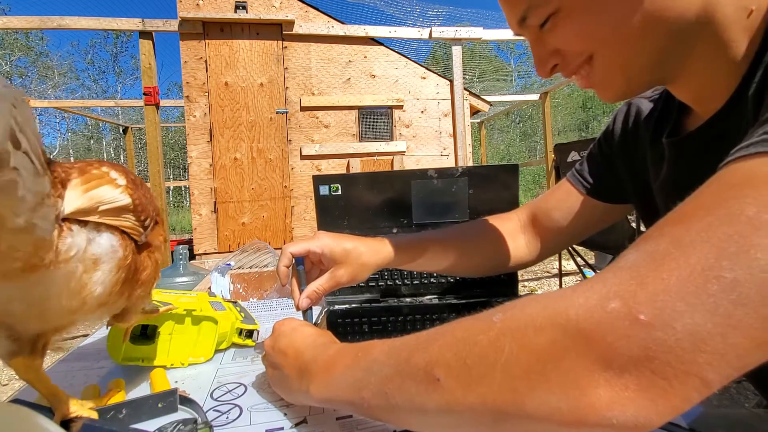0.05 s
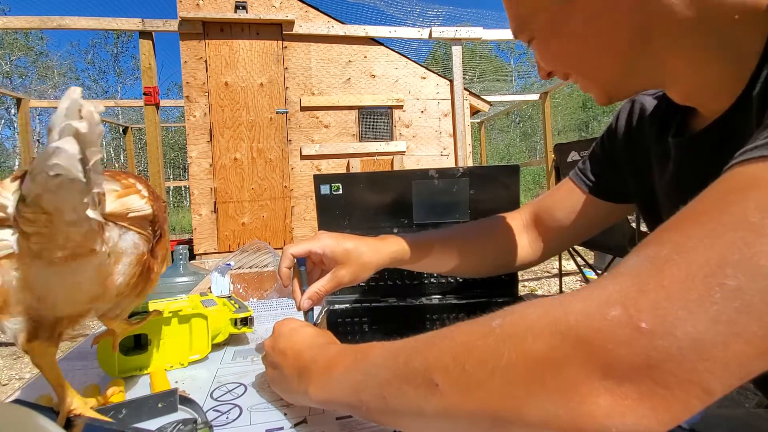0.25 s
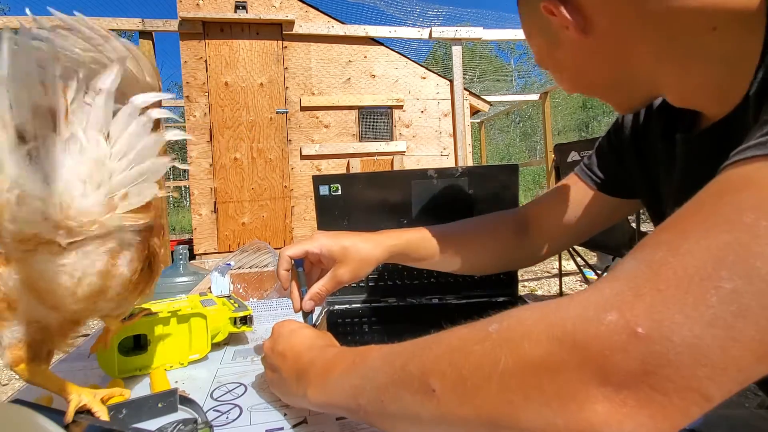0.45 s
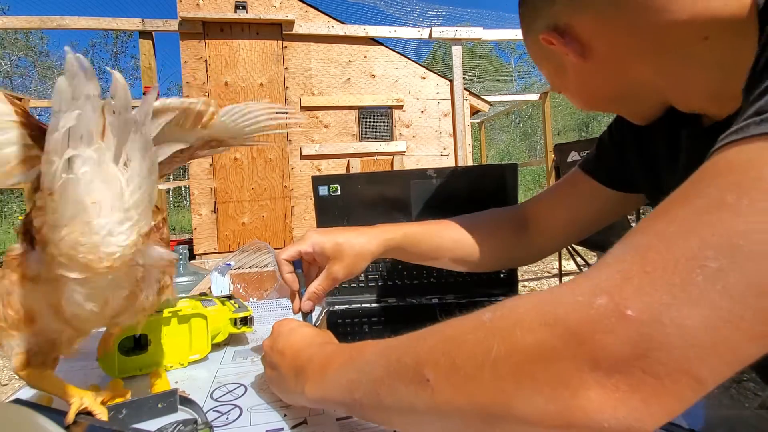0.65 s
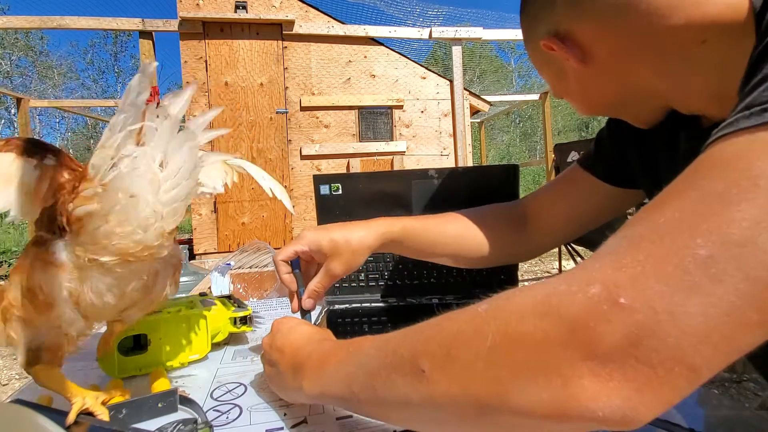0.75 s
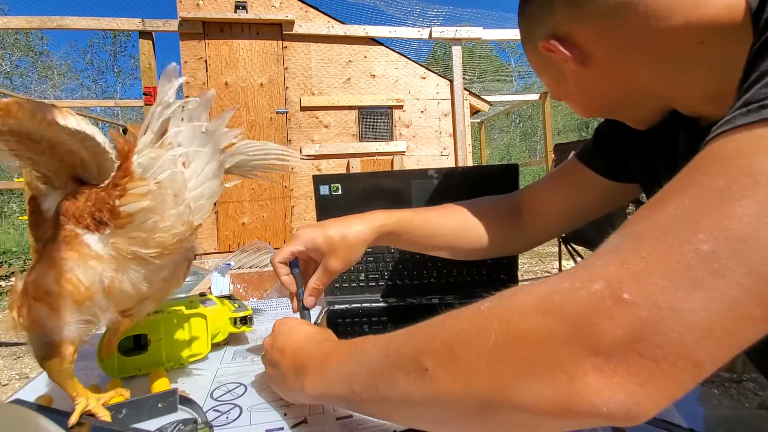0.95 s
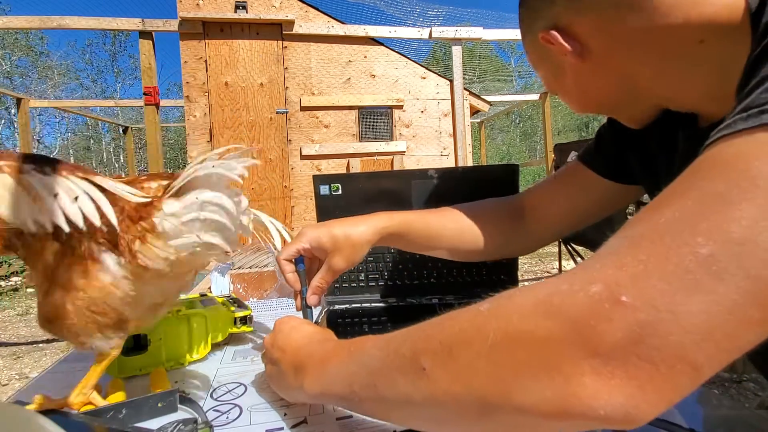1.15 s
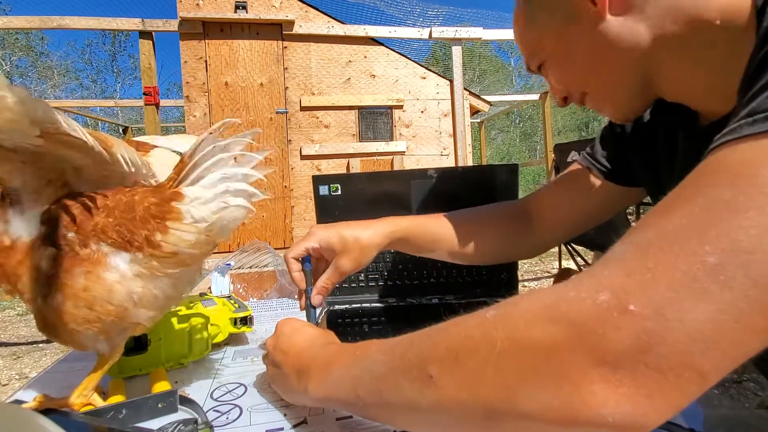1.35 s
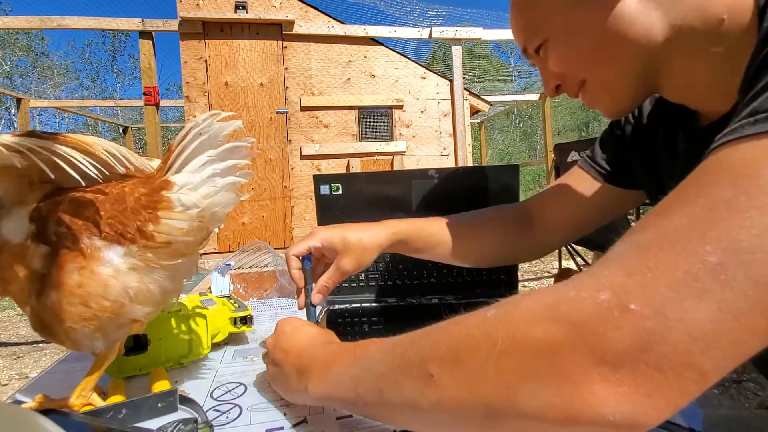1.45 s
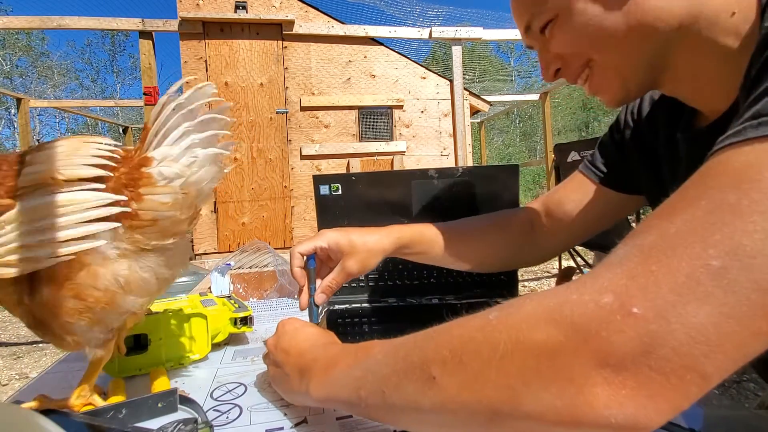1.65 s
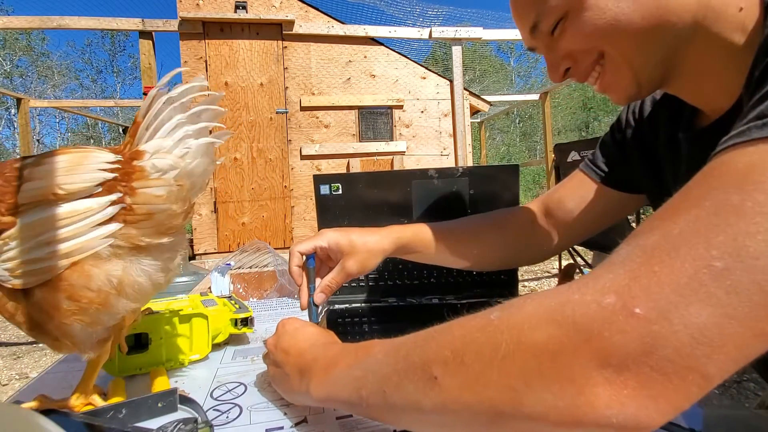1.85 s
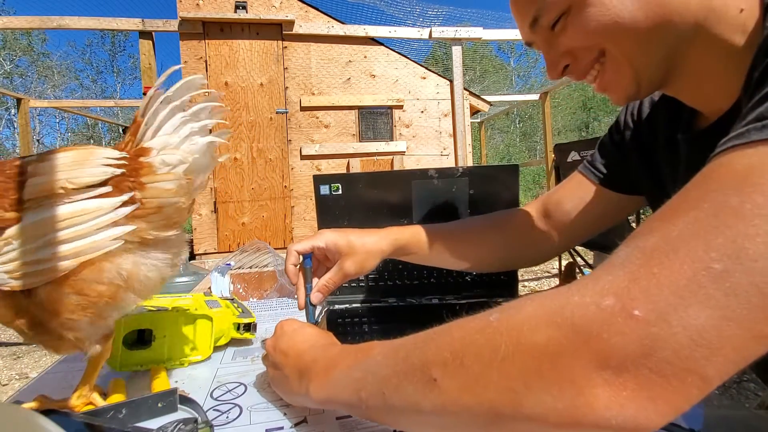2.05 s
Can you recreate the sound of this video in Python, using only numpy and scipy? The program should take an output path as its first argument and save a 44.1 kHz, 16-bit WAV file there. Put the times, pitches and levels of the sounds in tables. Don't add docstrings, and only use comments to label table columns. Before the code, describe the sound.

A hen flaps its wings right beside a stereo microphone, slightly left: a dense burst of feathery slaps early on, a pause with soft rustles, another short flap, then low air buffeting over faint yard hiss.

```python
import sys
import numpy as np
from scipy import signal
from scipy.fft import rfft, irfft
from scipy.io import wavfile
from scipy.ndimage import uniform_filter1d

SR = 44100
rng = np.random.default_rng(int(sys.argv[2]) if len(sys.argv) > 2 else 0)


def output_pcm(signal):
    pcm = np.clip(np.atleast_2d(signal).T, -1, 1) * 32767
    wavfile.write(sys.argv[1], SR, np.round(pcm).astype(np.int16))


def decibels_to_gain(level_db):
    exponent = np.asarray(level_db, float) / 20
    return 10 ** exponent


N = 92610
HALF_SIDE = np.array([[.5], [-.5]])
RIGHT_ONLY = np.array([[0], [1]])


def evened(x):
    return x / np.sqrt(np.mean(x ** 2) + 1e-20)


def read(points, hz):
    point_hz, value = np.transpose(points)
    return np.interp(np.log(hz + 1), np.log(point_hz + 1), value)


def coloured(x, gain):
    hz = np.fft.rfftfreq(x.shape[-1], 1 / SR)
    return irfft(rfft(x) * gain(hz), x.shape[-1])


def slow(hz, shape=N):
    return evened(coloured(rng.standard_normal(shape), lambda f: 1 / (1 + (f / hz) ** 2)))


def steadied(x, window_s):
    power = uniform_filter1d(x ** 2, size=max(int(window_s * SR), 3))
    return x / np.sqrt(power + 1e-20)


def burst(start_s, rise_s, fade_s):
    t = np.maximum(np.arange(N) / SR - start_s, 0)
    rise_s = max(rise_s, 1e-4)
    fall = decibels_to_gain(-60 * np.maximum(t - rise_s, 0) / max(fade_s, 1e-3))
    return np.minimum(t / rise_s, 1) * fall


def swirl(centre_s, half_s, hz, turn, lead=1):
    t = np.arange(N) / SR - centre_s
    width_s = np.where(t < 0, lead * half_s, (2 - lead) * half_s)
    return np.exp(-.5 * (t / width_s) ** 2) * np.cos(2 * np.pi * hz * t + turn)


def slaps(per_s, spread_db):
    shape = (2, N)
    happens = rng.random(shape) < per_s / SR
    size = decibels_to_gain(spread_db * np.minimum(rng.exponential(1, shape), 4))
    near, far = evened(rng.standard_normal(shape) * happens * size)

    def unlike(f):
        return f / np.hypot(f, 845)

    def alike(f):
        return np.sqrt(1 - unlike(f) ** 2)
    return np.array([near, coloured(near, alike) + coloured(far, unlike)])


def strokes():
    # start_s, peak_db, rise_s, fade_s (to fall 60 dB), tilt_db (per octave)
    wing_strokes = [(0.202, -6, 0.0023, 0.11, 2.74), (0.22, -8, 0.00092, 0.12, 3),
                    (0.23, -10, 0.0033, 0.24, 2.7), (0.258, -19.5, 0.0047, 0.58, 3.5),
                    (0.296, -23, 0.0031, 0.19, 4), (.317, -8, 0.0008, 0.14, 1.5),
                    (0.334, -14, 0.006, 0.27, 2.5), (0.362, -23.5, 0.0063, 0.068, -5),
                    (0.377, -29, 0.0071, 0.061, 1), (.42, -26.5, 0.021, 0.14, -0.5),
                    (.507, -25, 0.0023, 0.18, 3), (0.562, -33, 0.052, 0.27, -2),
                    (0.71, -27.5, 0.0014, 0.081, -1), (0.734, -25, 0.0039, 0.1, 1.5),
                    (0.841, -41, 0.033, 0.059, -2), (1.027, -31, 0.041, 0.19, 0.9),
                    (1.063, -26, 0.0025, 0.18, 4.65), (1.152, -11, 0.00022, 0.079, -0.3),
                    (1.166, -20.5, 0.0045, 0.41, 0.8), (1.211, -20, 0.0028, 0.11, 2.5),
                    (1.28, -39, 0.0077, 0.083, 2), (1.388, -38.5, 0.0032, 0.22, -2.5),
                    (1.717, -36.5, .003, 0.039, 0.5)]
    # pitch_hz, level_db (per Hz)
    stroke_colour = [(29, -70), (50, -3), (176, 1), (394, -12.5), (484, -10.5), (1330, -14.5),
                     (1560, -17.5), (3560, -27), (12000, -62.5), (15600, -63), (22000, -120)]
    # pitch_hz, width_hz, level_db
    body_modes = [(304, 13, 8), (483, 62, -0.5), (601, 85, -3.5), (1023, 49, -10)]
    body_db, stroke_db, low_db = 0.5, -7.5, -3
    clump_db, clump_hz, steady_s = 2.2, 70, 0.0173
    crack_db, crack_fade_s = -4.5, 0.0064
    bass_linger, bass_lag_s = 0.35, 0.0091

    def colour(f):
        ringing = sum(decibels_to_gain(db) / (1 + 2j * (f - hz) / width) for hz, width, db in body_modes)
        return decibels_to_gain(read(stroke_colour, f)) * (1 + decibels_to_gain(body_db) * ringing)

    rush = evened(coloured(slaps(per_s=9000, spread_db=2), colour))
    out = np.zeros((2, N))
    for octave in range(-4, 5):

        def octave_gain(f):
            distance = np.log2(f / 700 + 1e-9) - octave
            return np.cos(np.pi / 2 * np.clip(distance, -1, 1)) ** 2

        band = coloured(rush, octave_gain)
        clumps = decibels_to_gain(clump_db * slow(clump_hz))
        band = steadied(band, steady_s * 2. ** max(-octave, 0)) * band.std() * clumps
        power = 0
        for start_s, db, rise_s, fade_s, tilt in wing_strokes:
            swell_s = rise_s + bass_lag_s * max(-octave - 1, 0)
            body = burst(start_s, swell_s, fade_s * 2 ** (-bass_linger * octave))
            crack = decibels_to_gain(crack_db) * burst(start_s, swell_s, crack_fade_s)
            level = decibels_to_gain(db + tilt * max(octave, -2.6))
            power = power + level ** 2 * (body ** 2 + crack ** 2)
        out += band * np.sqrt(power) * decibels_to_gain(low_db * (octave < -1))
    return decibels_to_gain(stroke_db) * out


def swishes():
    # start_s, peak_db, rise_s, fade_s (to fall 60 dB), pitch_hz
    vane_swishes = [(.01, -65, 0.26, 3.0, 12100), (.105, -48.5, 0.027, 0.22, 2780),
                    (.105, -54.5, 0.029, 0.18, 8900), (0.204, -48, 0.0011, .03, 9050),
                    (.221, -45, .001, 0.038, 11000), (0.28, -47, .002, 0.034, 9000),
                    (0.316, -52, 0.0017, 0.11, 11000), (.427, -35.5, 0.003, 0.014, 9100),
                    (0.506, -46, 0.0017, 0.061, 8600), (0.536, -46, 0.0065, 0.062, 10200),
                    (.57, -57, 0.017, 0.2, 12000), (.735, -52.5, .002, 0.04, 9500),
                    (.856, -53, 0.002, 0.02, 9000), (1.063, -41.5, 0.00089, 0.03, 11400),
                    (1.077, -59, .001, .01, 7000), (1.095, -50.5, .015, 0.34, 7900),
                    (1.15, -42, .002, 0.025, 11900), (1.158, -50, 0.0016, 0.26, 11300),
                    (0.738, -38.5, 0.0017, 0.032, 2600), (.542, -44, .004, .04, 3640),
                    (0.734, -48, 0.0017, 0.028, 5500), (1.078, -51, 0.00093, .015, 14500)]
    # start_s, peak_db, fade_s (to fall 60 dB), pitch_hz
    quill_taps = [
        (1.067, -36, .03, 4000),
        (1.1525, -28, .025, 2100),
        (1.173, -46, .015, 5000),
        (1.214, -35, .06, 2200),
    ]
    fizz = slaps(per_s=12000, spread_db=2.5)

    def band(hz, share):
        narrow = coloured(fizz, lambda f: 1 / (1 + ((f - hz) / (share * hz)) ** 4))
        return steadied(narrow, .006)

    out = np.zeros((2, N))
    for start_s, db, rise_s, fade_s, hz in vane_swishes:
        out += decibels_to_gain(db) * burst(start_s, rise_s, fade_s) * band(hz, share=.5)
    for start_s, db, fade_s, hz in quill_taps:
        out += decibels_to_gain(db) * burst(start_s, .001, fade_s) * band(hz, share=.1)
    return out


def rings():
    # peak_s (the actual peak comes 0.65 half-lengths sooner), peak_db, half_length_s, pitch_hz
    blows = [(0.207, -24, 0.00547, 623), (.213, -21.5, 0.0088, 492), (.214, -22, 0.0075, 907),
             (.217, -20, 0.01, 307), (.227, -27, 0.0036, 243), (.230, -27, 0.0049, 613),
             (.239, -24, 0.0055, 494), (.275, -22, 0.0035, 196), (.321, -27, 0.0038, 594),
             (.338, -28.5, 0.00503, 460), (.341, -25.5, 0.01885, 316.3), (.516, -48, 0.0071, 1095),
             (.59, -39, 0.011, 450), (.605, -39, 0.021, 300), (.61, -45, .018, 702),
             (0.717, -40, 0.0058, 657), (.742, -39.5, 0.0064, 1074), (.75, -44, 0.012, 657),
             (1.068, -36, 0.012, 210), (1.085, -42, 0.028, 504), (1.155, -27, 0.0022, 510),
             (1.163, -24.5, 0.0047, 235), (1.170, -28, 0.0044, 845), (1.174, -32.5, 0.0076, 503),
             (1.79, -41.5, 0.018, 141)]
    lead = .35
    apart_hz = 1200
    out = np.zeros((2, N))
    for peak_s, db, half_s, hz in blows:
        turn = 2 * np.pi * rng.random() - RIGHT_ONLY * hz / apart_hz
        out += decibels_to_gain(db) * swirl(peak_s - (1 - lead) * half_s, half_s, hz, turn, lead)
    return out


def ports(x):
    # pitch_hz, difference_db
    shadow = [(60, -2), (110, -1), (200, 0), (380, 2), (700, 5.5), (1290, 4), (2380, 4.5), (4400, 4.5),
              (8120, 8.5), (15000, 1.5)]
    right_lag_s = 0.00018

    def path(f):
        delay = np.exp(-2j * np.pi * f * RIGHT_ONLY * right_lag_s)
        return decibels_to_gain(HALF_SIDE * read(shadow, f)) * delay
    return coloured(x, path)


def buffeting():
    # time_s, level_db, left_minus_right_db
    breeze = [(0, -41, 5), (.15, -33.5, 14.5), (.45, -35.5, 3.5), (.62, -34.5, 1.5), (.8, -38.5, 10.5),
              (.96, -35.5, 4), (1.07, -37, 2), (1.27, -31.5, 7.5), (1.42, -43, 4), (1.6, -38, 8),
              (1.7, -44, 5.5), (1.81, -37, 18), (1.88, -45, 0), (2.1, -50, 7)]
    # peak_s, peak_db, half_length_s, turning_hz, left_minus_right_db
    gusts = [(0.059, -26.5, 0.0038, 75, 23.5), (0.101, -36.5, 0.015, 98.5, 28),
             (0.151, -31.4, 0.019, 70.7, 6.5), (0.215, -23, 0.0096, 140, -1), (0.222, -31, 0.017, 63, -20),
             (0.231, -21, 0.017, 105.3, -1), (0.236, -23.4, 0.017, 178, 2), (0.26, -24.5, 0.0095, 146, 3),
             (0.297, -29.5, 0.015, 181, 4), (0.31, -29, 0.017, 79, -3), (0.33, -22.5, 0.011, 136, 2),
             (0.357, -24.5, 0.02, 106, 1), (0.365, -33, 0.012, 176, 0.6), (0.368, -32, 0.024, 62, 2),
             (0.372, -19, 0.021, 79.5, 0), (0.398, -33, 0.039, 121.5, -3), (0.517, -25.5, 0.0073, 84, 22.5),
             (0.557, -27.5, 0.015, 78.6, 13.7), (0.669, -30.5, 0.011, 95.5, 10),
             (0.747, -31.5, 0.027, 53, -5), (0.78, -26, 0.0077, 74, 17.4), (0.81, -27, 0.016, 49.7, 6),
             (0.85, -30, 0.012, 67.4, 21.5), (0.881, -32, 0.0035, 73, 17.5), (0.907, -27.5, 0.0063, 67, 27),
             (1.012, -32, 0.01, 67.4, 20.5), (1.121, -26, 0.0093, 55.4, 6), (1.163, -29, 0.0053, 56, 5),
             (1.164, -27, 0.0055, 126, 2), (1.22, -28, 0.025, 73.6, 1.9), (1.315, -23.5, 0.0093, 74, -1),
             (1.353, -29, 0.012, 81, 4), (1.445, -34, 0.0063, 71.4, -21.5),
             (1.479, -25.5, 0.017, 49.5, -10.5), (1.524, -33, 0.018, 73, -11),
             (1.539, -34.5, 0.015, 58.3, 18), (1.616, -38.8, 0.019, 82.5, 27), (1.656, -34, 0.018, 72, 19),
             (1.726, -28, 0.0049, 82, 17.5), (1.775, -41.5, 0.007, 134, 35)]
    # pitch_hz, level_db (per Hz)
    air_colour = [(8.8, -40), (15, -6), (43, -2), (70, -1), (162, -13), (234, -27.5), (282, -30.5),
                  (414, -33.5), (600, -28), (780, -70), (1320, -120)]
    ripple_db, ripple_ratio = -20, 3.1
    apart_per_db = -0.08

    def colour(f):
        return decibels_to_gain(read(air_colour, f) - 12.6 * np.log2(np.maximum(f / 300, 1)))

    t = np.arange(N) / SR
    time_s, level_db, pan_db = np.transpose(breeze)
    air = steadied(coloured(rng.standard_normal((2, N)), colour), 0.0362)
    out = decibels_to_gain(np.interp(t, time_s, level_db) + HALF_SIDE * np.interp(t, time_s, pan_db)) * air
    for peak_s, db, half_s, hz, pan in gusts:
        a, b = rng.uniform(-0.93, 1, 2)
        turn = np.pi * a + HALF_SIDE * np.sign(b) * apart_per_db * abs(pan)
        eddy = swirl(peak_s, half_s, hz, turn)
        ripple = decibels_to_gain(ripple_db) * swirl(peak_s, half_s / 2, ripple_ratio * hz, np.pi * b + turn)
        out += decibels_to_gain(db + HALF_SIDE * pan) * (eddy + ripple)
    return out


def insects():
    centre_hz, width_hz, level_db, pan_db = 8680, 770, -62.5, 9
    throb_db, throb_hz = 3, 40
    noise = rng.standard_normal((2, N))
    band = evened(coloured(noise, lambda f: 1 / (1 + (2 * (f - centre_hz) / width_hz) ** 4)))
    return decibels_to_gain(level_db + HALF_SIDE * pan_db + throb_db * slow(throb_hz)) * band


def yard_hiss():
    # pitch_hz, level_db (per Hz)
    hiss_colour = [(120, -27), (200, 1), (594, -1.5), (651, -2.5), (1360, -8.5), (1790, -9.5), (8600, -13),
                   (15000, -30), (16400, -19)]
    # pitch_hz, difference_db
    hiss_side = [(60, 2.5), (110, 25), (200, 12), (380, -1), (700, 3.0), (1290, 3.5), (2380, 5),
                 (4400, 10.5), (8120, 9), (15000, 18)]
    same, lag_s, patch_db, level_db = 0.11, 0.00045, 0.5, -49.5

    def colour(f):
        low_cut = f ** 2 / (f ** 2 + 150 ** 2)
        return decibels_to_gain(read(hiss_colour, f) + HALF_SIDE * read(hiss_side, f)) * low_cut

    left, other = rng.standard_normal((2, N))
    late = coloured(left, lambda f: np.exp(-2j * np.pi * f * lag_s))
    right = same * late + np.sqrt(1 - same ** 2) * other
    pair = np.array([left, right]) * decibels_to_gain(patch_db * slow(hz=40))
    return decibels_to_gain(level_db) * evened(coloured(pair, colour))


def scene():
    hen = ports(strokes() + swishes() + rings())
    return hen + buffeting() + insects() + yard_hiss()


def top_cut(x):
    return signal.sosfilt(signal.butter(12, 15870, fs=SR, output="sos"), x)


def record(dry):
    low_cut_hz, ceiling, top_hz = 36, .8, 15850
    x = coloured(dry, lambda f: 1 / np.sqrt(1 + (low_cut_hz / (f + 1)) ** 6))
    x = ceiling * np.tanh(x / ceiling)
    band_limit = signal.firwin(511, top_hz, window=("kaiser", 9), fs=SR)
    x = signal.oaconvolve(x, band_limit[None], "same")
    return top_cut(x)


dry = scene()
out = record(dry)
output_pcm(out)
```